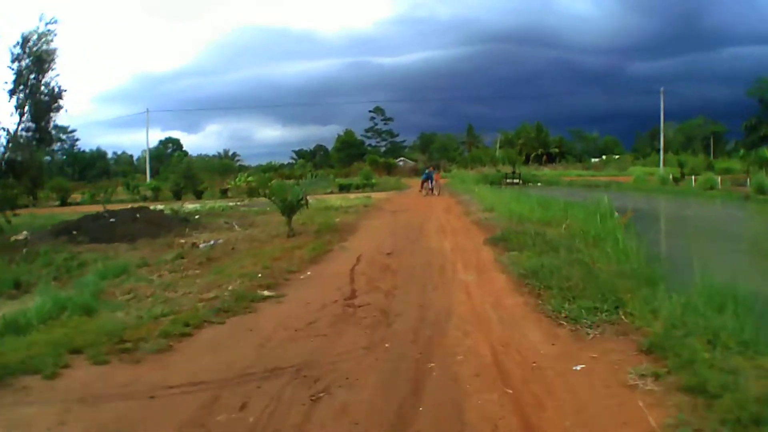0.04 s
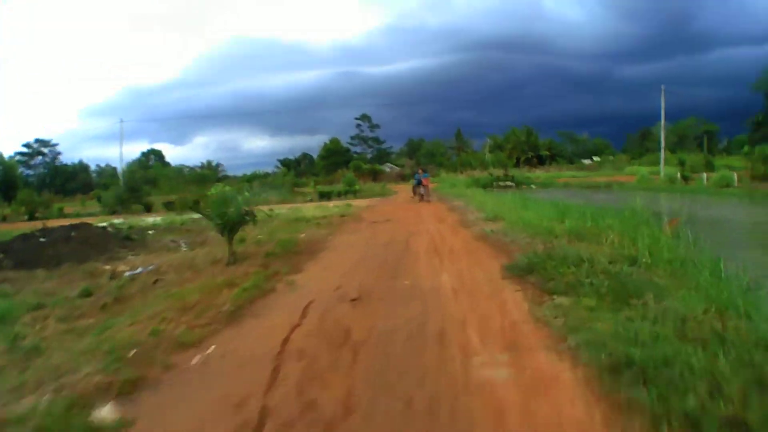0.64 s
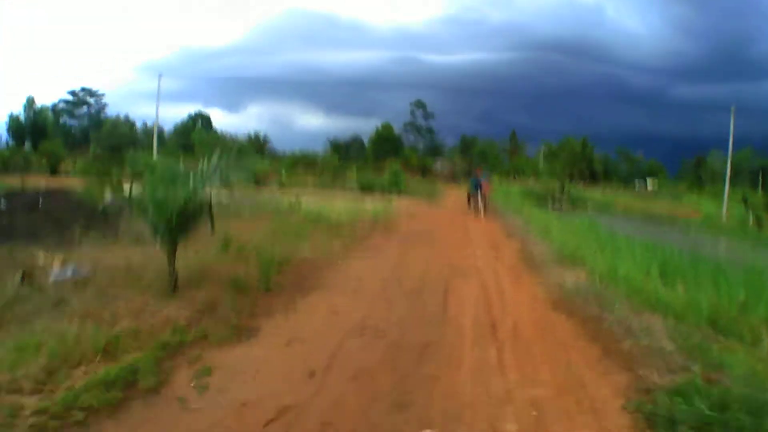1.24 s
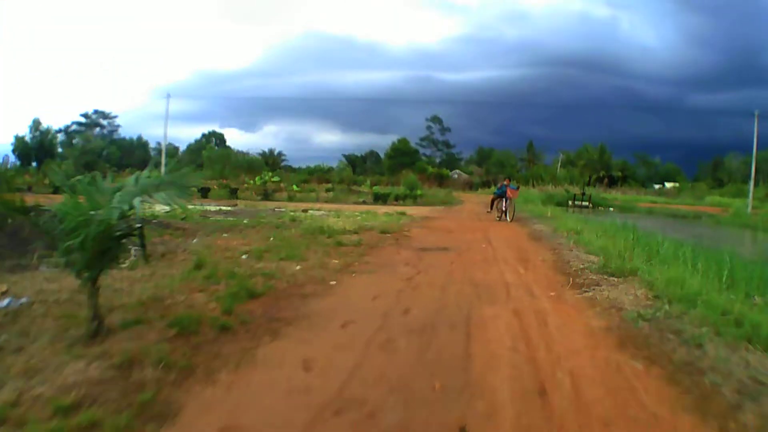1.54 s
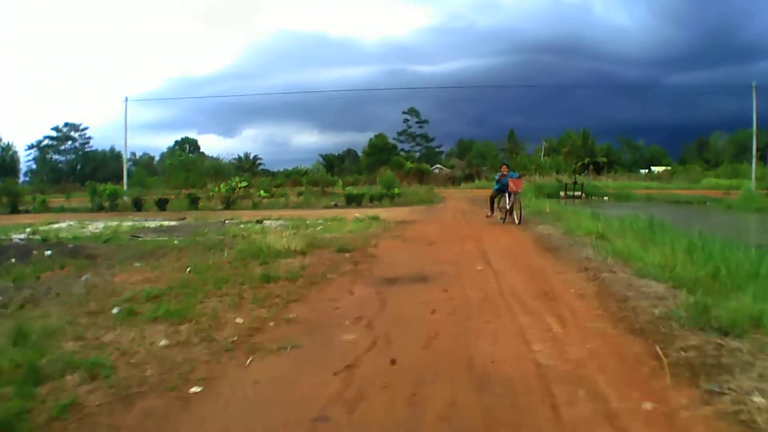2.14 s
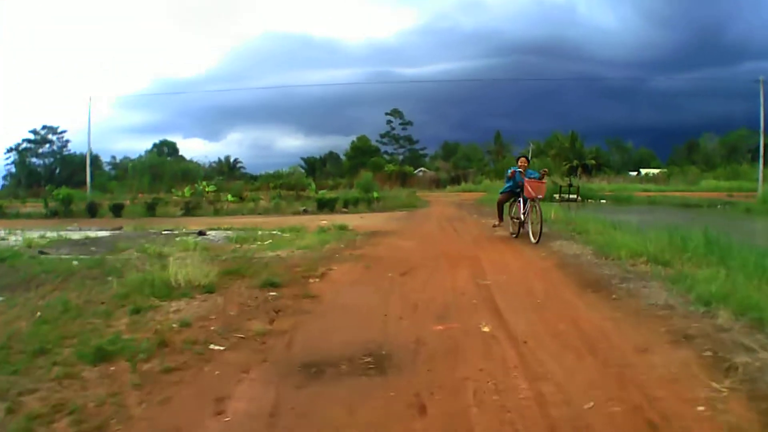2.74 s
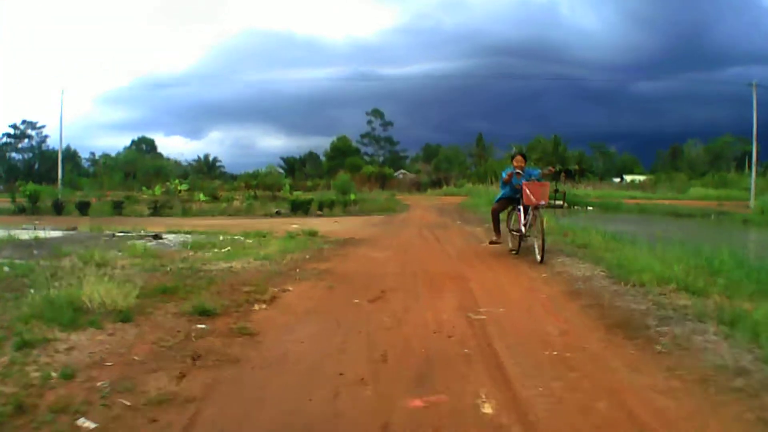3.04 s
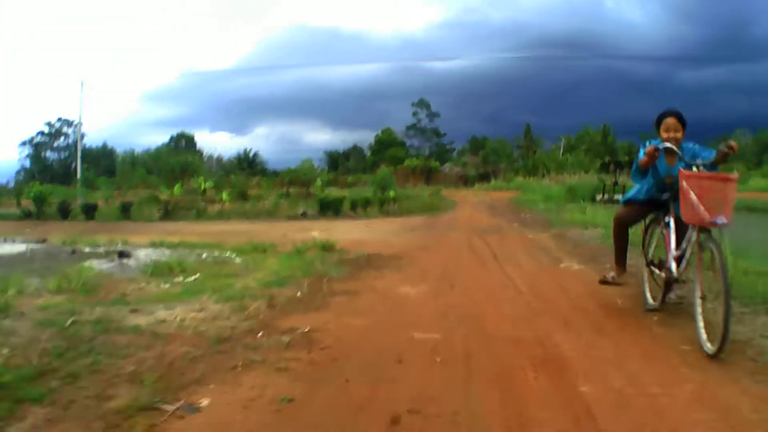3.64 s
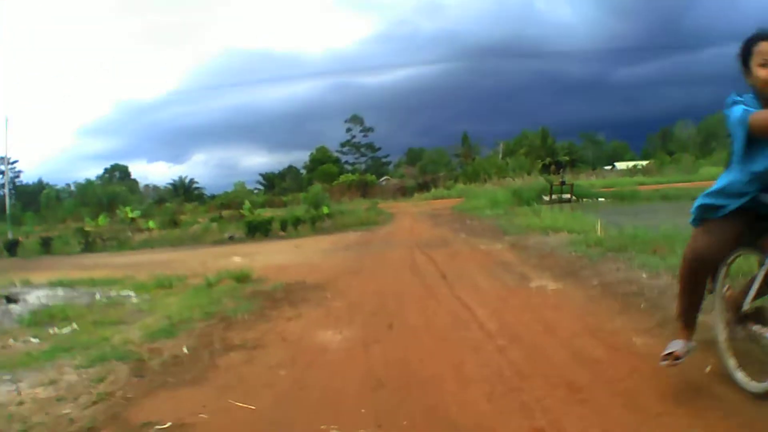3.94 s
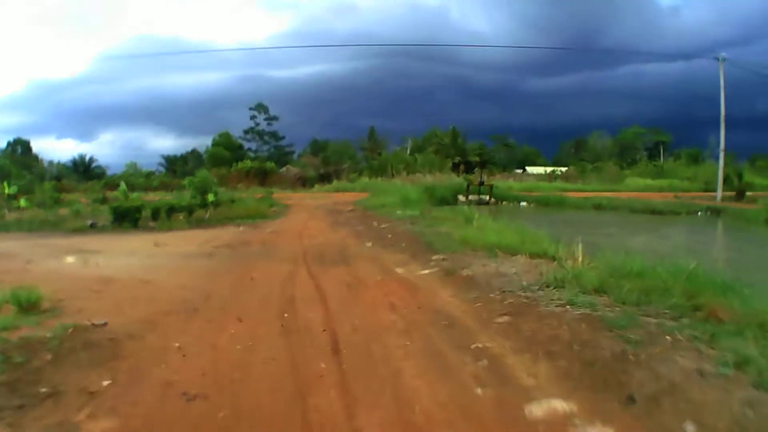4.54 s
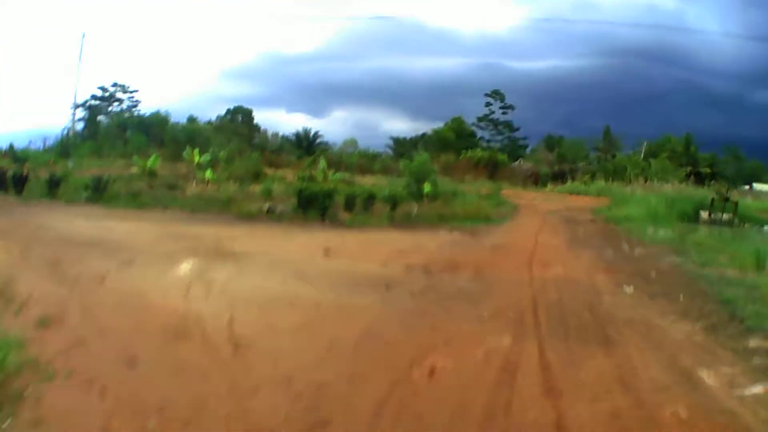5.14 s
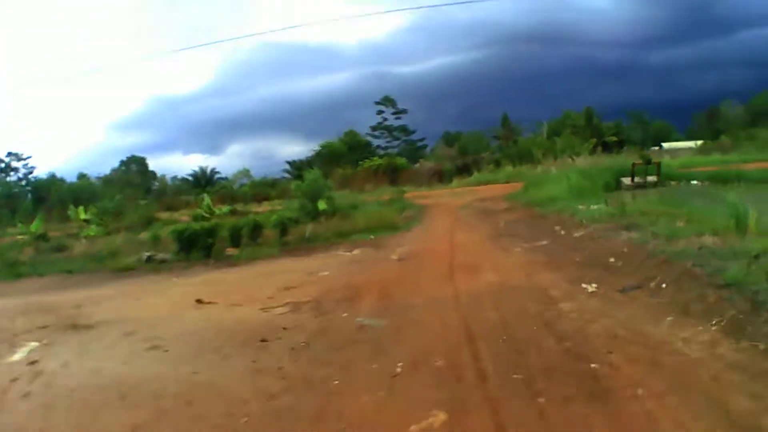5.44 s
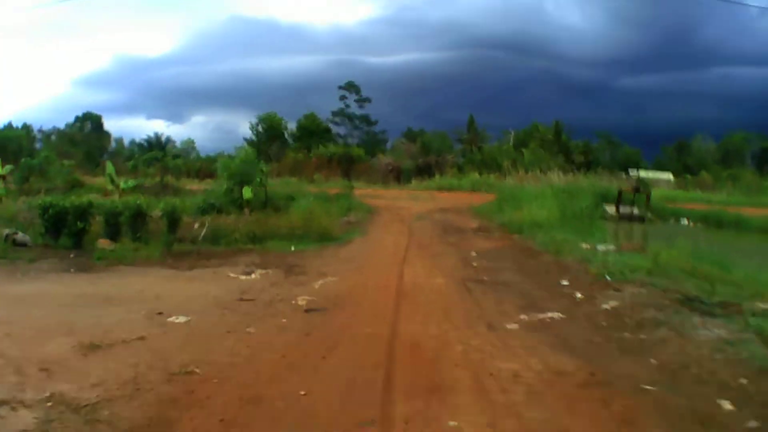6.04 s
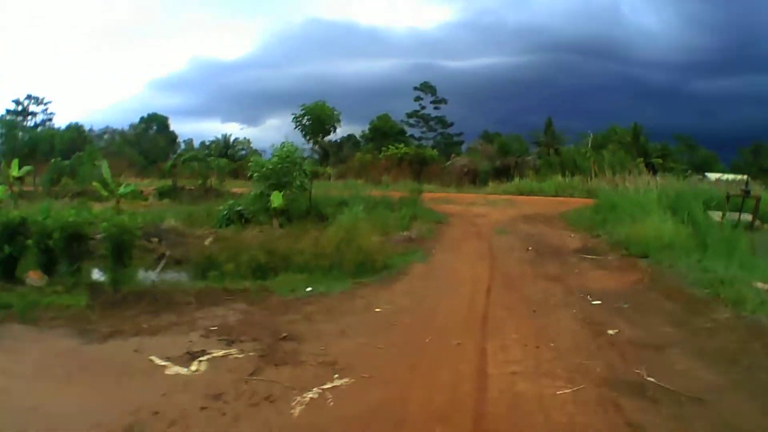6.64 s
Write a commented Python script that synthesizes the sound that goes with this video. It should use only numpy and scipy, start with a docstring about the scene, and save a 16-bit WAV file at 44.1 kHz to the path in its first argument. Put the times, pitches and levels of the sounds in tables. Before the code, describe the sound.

A small motorcycle runs at a steady pace for the whole seven seconds, heard from the saddle on a rough dirt road. The engine is a low, throbbing drone with a boomy body and faint whirr, wavering slightly in pitch and swelling briefly around 3.4, 4.6, 5.4 and 6.5 seconds. Low wind flutter and tyre rumble continue underneath. A loose plastic part ticks quickly and unevenly throughout, with sharper snaps near 1.2, 3.8 and 4.9 seconds. Bumps knock the bodywork with short dull thuds and hollow clacks: several come between 0.2 and 1.2 seconds, a stronger one at 1.8, and a cluster from 2.5 to 3.3. Further thuds follow at about 4.7, 4.9 and 6.5 seconds as the ride carries on.

```python
"""Rough dirt road, heard from the saddle of a small single-cylinder motorcycle.
Wind flutters, tyres rumble through the panels, bumps knock the bodywork.
A loose plastic part ticks about once per crank turn, harder when the road throws it.
The four-stroke engine whirrs in the crankcase, booms in the frame and drones in the silencer."""
import sys
import numpy as np
from scipy import signal
from scipy.io import wavfile
from scipy.ndimage import uniform_filter1d

SR = 44100
rng = np.random.default_rng(int(sys.argv[2]) if len(sys.argv) > 2 else 0)


def materialize(psi):
    """Save the field psi as 16-bit PCM at rate SR to the path in sys.argv[1].

    A 1-D psi becomes a single channel; in a 2-D psi each row is a channel.
    """
    bounded = np.clip(np.atleast_2d(psi).T, -1, 1)
    quanta = np.round(bounded * 32767).astype(np.int16)
    wavfile.write(sys.argv[1], SR, quanta)


N = 298998
TIME_S = np.arange(N) / SR
DRONE_ORDER = 10  # drone cycles per firing
LIGHT_TICK_DB = -43

# Wind and rolling noise: f/Hz, relative density/dB
AIR_SPECTRUM = [(12, -15), (19, 20.5), (30, 1.5), (65, 7), (88, -1), (128, 8.5), (155, 16.5), (210, -11.5),
                (450, -5.5), (900, -15.5), (2000, -22.5)]
# Rumble from road roughness: t/s, level/dB
RUMBLE_LEVEL = [(0, -40), (0.7, -38), (0.85, -43), (1.0, -36.5), (1.3, -39.5), (1.6, -39.5), (1.75, -42.5),
                (2.15, -36.5), (2.45, -41), (2.7, -37.5), (3.2, -41), (3.35, -37.5), (3.7, -37.5),
                (3.98, -43), (4.15, -36), (4.45, -40.5), (4.75, -43), (5.0, -40), (5.3, -36.5),
                (5.52, -44.5), (5.7, -34), (5.85, -39), (6.02, -45.5), (6.15, -37.5), (6.3, -40.5),
                (6.5, -37.5), (6.78, -38.5)]
# Bumps: t/s, thud peak/dB, ring f/Hz, length/s, clack re thud/dB
BUMPS = [(0.244, -22.5, 560, 0.027, -6.5), (0.517, -19, 333, 0.012, -19), (0.788, -19.5, 532, 0.0062, -15),
         (1.034, -22.5, 510, 0.029, -12), (1.222, -22, 458, 0.015, -12), (1.799, -18.5, 500, 0.025, -5.5),
         (2.553, -18, 467, 0.024, -0.5), (2.657, -27.5, 542.3, 0.034, -11), (2.757, -37, 440, 0.0069, 15.5),
         (2.79, -23, 332, 0.01, -4), (3.079, -23, 313.6, 0.015, -4.5), (3.317, -29, 766, 0.02, -17),
         (3.81, -33, 740, 0.012, 5.5), (4.691, -21, 720, 0.0081, -28), (4.886, -21, 384.2, 0.032, -18),
         (6.491, -21.5, 321, 0.034, -11.5)]
# Panel damping, lower for a clean landing: clack re thud/dB, ring width/Hz
PANEL_DAMPING = [(-24, 75), (-10, 150)]

# Machine resonances: f/Hz, width/Hz, gain/dB
PANEL_MODES = [(425, 22, 5), (568.5, 45, 10.5), (620, 100, 2), (749, 110, 1.5), (825, 44, -14)]
FAIRING_MODES = [(870, 210, -11), (1190, 550, -11), (1335, 43, -0.5), (1850, 480, -12.5)]
CRANKCASE_MODES = [(1347, 82, 6.6), (1674, 270, 1), (1865, 140, 2.7)]
FRAME_MODES = [(249, 22, -2.5), (312.1, 82.5, 8.5), (328.5, 75, 0)]
# Resonances of the loose part and its seat: f/Hz, width/Hz, gain/dB
HOLLOW_MODES = [(1405, 140, -2), (1857, 350, 5), (2297, 430, -7.5), (2880, 403, 3.5)]
EDGE_MODES = [(4385, 830, 1), (4620, 380, -6.5), (5230, 230, -18.5)]
UPPER_EDGE_MODES = [(5860, 240, -9.5), (6440, 1300, -5.5)]
SEAT_MODES = [(2360, 640, -1), (2710, 750, -6.5), (3320, 210, -9.5), (3750, 320, -13), (4300, 450, -10),
              (5950, 730, -18)]
# Dips in the tick spectrum: f/Hz, width/Hz, gain/dB
TICK_NOTCHES = [(3340, 990, -5.5), (5660, 620, -4)]

# Part thrown by the road: t/s, snap level/dB, hollow level/dB
HARD_TICKS = [(0.049, -33.5, -33.5), (0.109, -34.5, -36), (0.4, -33.5, -33), (0.4608, -30, -31),
              (0.5191, -31.5, -31.0), (0.6567, -40.5, -38), (0.6935, -33, -33.5), (0.727, -33.0, -35),
              (0.7471, -35.5, -34.5), (0.7962, -37, -35), (0.8496, -36.5, -36.5), (0.8954, -39, -39),
              (0.9397, -31.5, -33.5), (0.9685, -33, -33), (1.0043, -32.5, -35), (1.0333, -34.5, -32),
              (1.063, -32.5, -37.5), (1.1188, -34.0, -35), (1.141, -36, -35.5), (1.1734, -31.5, -32.5),
              (1.212, -27.0, -30.5), (1.231, -29, -33.0), (1.2639, -33.5, -31), (1.292, -29.5, -31),
              (1.345, -28, -30.0), (1.375, -27.5, -30), (1.4072, -33.5, -34), (1.4746, -29.5, -32.0),
              (1.5316, -39, -35), (1.5664, -35.5, -35.5), (1.595, -31.0, -28.5), (1.6642, -32, -36.5),
              (1.7433, -37, -34.5), (1.7756, -37, -33.0), (1.8011, -34.5, -33.5), (1.8558, -33.5, -32),
              (1.9131, -31, -33), (1.9423, -37, -38), (1.9714, -33, -32), (2.0102, -35, -36.5),
              (2.0401, -28.5, -31.5), (2.0994, -34, -36.5), (2.171, -38, -35.5), (2.1988, -32.0, -39),
              (2.2249, -30, -33.0), (2.2769, -33.5, -33.5), (2.3408, -36, -34.5), (2.3963, -34.5, -34),
              (2.5522, -35, -33), (2.5754, -32.5, -32), (2.624, -37, -33.5), (2.6803, -34.5, -34.0),
              (2.713, -32.5, -34), (2.733, -32, -32), (2.7909, -38.5, -34.5), (2.8854, -36.5, -37.5),
              (2.9165, -36, -33), (2.9705, -34.5, -35.5), (3.036, -36.5, -36.5), (3.0967, -37.5, -38.5),
              (3.3017, -35, -33.5), (3.3524, -36.0, -38), (3.4107, -35.0, -36.0), (3.4737, -39, -37.5),
              (3.552, -36.0, -36), (3.613, -34, -32), (3.6733, -34.5, -35.0), (3.7227, -37.5, -38),
              (3.7942, -22, -25), (3.8244, -33.5, -31.5), (3.8562, -30.5, -31), (3.917, -32.5, -33),
              (3.9791, -32.5, -32.5), (4.008, -33.5, -32.5), (4.0347, -29.5, -32), (4.0945, -32.5, -35.5),
              (4.211, -35.5, -35), (4.2653, -34, -32.5), (4.3313, -28, -33.5), (4.3875, -34, -33),
              (4.442, -30.5, -36), (4.4974, -34.5, -33.5), (4.5639, -31, -32.5), (4.624, -37, -35.0),
              (4.6719, -32.5, -34), (4.733, -30.5, -30.5), (4.8653, -23.5, -29.5), (4.8897, -30.5, -31),
              (4.9215, -31.5, -31.0), (4.9527, -36, -34.5), (4.9888, -29.5, -32), (5.0767, -37.5, -38),
              (5.1118, -38.0, -33.0), (5.1972, -31, -35), (5.2265, -34, -32.5), (5.2535, -38, -38),
              (5.3938, -35, -34.5), (5.4541, -33.5, -34), (5.4863, -39.5, -38.5), (5.52, -33.0, -32.0),
              (5.5668, -37, -35.5), (5.67, -36, -31.5), (5.7264, -35.5, -34.5), (5.7803, -33, -34),
              (5.8296, -35.5, -33.5), (5.885, -36.5, -34.0), (5.956, -34.0, -34.5), (5.984, -38, -41),
              (6.003, -33, -32), (6.0632, -33, -32.5), (6.0896, -42, -34.5), (6.1207, -31, -30.5),
              (6.1788, -29, -29), (6.2421, -29, -36.5), (6.2908, -35.5, -33.5), (6.3557, -32.5, -33.0),
              (6.4578, -36.5, -39), (6.655, -33, -32), (6.7193, -46, -36)]
# Part resting on its seat: t/s, length/s
RESTS = [(0.139, 0.11), (2.432, 0.071), (2.986, 0.028), (3.184, 0.058), (4.746, 0.092), (5.02, 0.076),
         (5.264, 0.066), (6.47, 0.11)]
# Part sliding on its seat: t/s, length/s, level/dB, f/Hz, width/Hz
SLIDES = [(0.07, 0.018, -53, 3270, 60), (0.264, 0.011, -41.5, 4240, 900), (0.603, 0.017, -46, 4520, 900),
          (3.33, 0.04, -63, 5900, 700), (4.246, 0.027, -51, 3814, 900), (5.756, 0.023, -55, 4311, 700)]

# Frame boom: t/s, level/dB
FRAME_LEVEL = [(0.0, -33.5), (0.32, -34), (0.38, -26.5), (0.45, -35), (0.49, -28.5), (0.98, -30),
               (1.05, -25.5), (1.09, -34.5), (1.38, -32), (4.36, -30), (4.49, -36.5), (4.55, -30),
               (4.66, -33), (4.68, -27), (4.79, -34), (4.97, -27.5), (5.0, -36.5), (5.27, -28.5),
               (6.06, -31.5), (6.21, -29.5), (6.29, -41), (6.34, -29.5), (6.78, -31)]
# Exhaust drone, tied to engine speed: t/s, f/Hz
EXHAUST_PITCH = [(0.0, 182.3), (0.34, 181.9), (0.51, 157.5), (0.68, 176.4), (0.87, 178), (1.05, 161),
                 (1.62, 177.4), (2.06, 163.6), (2.11, 177.1), (2.98, 168.1), (3.02, 180.1), (3.49, 179),
                 (3.78, 163), (3.85, 173.3), (4.63, 178.9), (5.17, 159.4), (5.27, 175.3), (5.91, 175.4),
                 (6.27, 161.6), (6.55, 184.3), (6.69, 165), (6.78, 181)]
# Exhaust drone: t/s, level/dB
EXHAUST_LEVEL = [(0.0, -30), (0.23, -44), (0.32, -25.5), (0.38, -36), (0.79, -31.5), (0.83, -42),
                 (0.89, -34), (1.23, -35), (1.26, -28.5), (1.32, -39), (1.34, -29), (2.23, -30.5),
                 (2.28, -39), (2.32, -30.5), (2.45, -57), (2.51, -28), (2.64, -37), (2.68, -28),
                 (2.76, -51), (2.79, -26.5), (2.85, -44), (2.91, -30), (3.13, -28.5), (3.19, -37),
                 (3.38, -20.5), (3.44, -35), (3.53, -27.5), (3.91, -35.5), (4.27, -24.5), (4.32, -37),
                 (4.38, -25.5), (4.46, -48), (4.59, -20.5), (4.63, -40), (4.74, -45), (4.78, -29),
                 (4.83, -53), (4.89, -33), (5.3, -31), (5.38, -40), (5.42, -20), (5.48, -54), (5.53, -30),
                 (5.83, -27.5), (5.89, -37), (6.04, -37), (6.1, -28), (6.46, -36.5), (6.5, -21.5),
                 (6.53, -19.5), (6.57, -34), (6.61, -25), (6.78, -36)]


def from_db(db):
    """Decibels to gain."""
    return 10 ** (np.asarray(db) / 20)


def unit_rms(x):
    """Scale to rms 1."""
    return x / np.sqrt(np.mean(x ** 2) + 1e-20)


def curve(rows):
    """Breakpoints interpolated per sample."""
    return np.interp(TIME_S, *np.transpose(rows))


def hump(at_s, length_s):
    """Gaussian swell, peak 1."""
    return np.exp(-(2 * (TIME_S - at_s) / length_s) ** 2)


def drift(rate_hz):
    """Slow random wander, rms 1."""
    hop, settle = 40, 2000
    pole = np.exp(-2 * np.pi * rate_hz * hop / SR)
    white = rng.standard_normal(N // hop + settle + 2)
    slow = signal.lfilter([1], [1, -2 * pole, pole * pole], white)[settle:]
    return np.interp(np.arange(N) / hop, np.arange(len(slow)), unit_rms(slow))


def resonate(x, hz, width_hz):
    """Two-pole resonance, peak gain 1."""
    radius = np.exp(-np.pi * width_hz / SR)
    feedback = [1, -2 * radius * np.cos(2 * np.pi * hz / SR), radius ** 2]
    return signal.lfilter(np.array([1, 0, -1]) * (1 - radius ** 2) / 2, feedback, x + 1e-18)


def resonate_twice(x, hz, width_hz):
    """Resonance with steeper skirts."""
    return resonate(resonate(x, hz, width_hz), hz, width_hz)


def ring_modes(x, modes, scatter_db=0):
    """Parallel resonances, optional random gain per mode."""
    return sum(from_db(db + scatter_db * rng.standard_normal()) * resonate(x, hz, width_hz)
               for hz, width_hz, db in modes)


def band(x, low_hz, high_hz):
    """Butterworth band-pass."""
    return signal.sosfilt(signal.butter(2, [low_hz, high_hz], "band", fs=SR, output="sos"), x)


def steady(x, window_s):
    """Hold the running rms at 1."""
    size = max(int(window_s * SR / 2), 1)
    return x / np.sqrt(uniform_filter1d(uniform_filter1d(x ** 2, size), size) + 1e-20)


def add(out, at_s, sound):
    """Mix a sound in at a time."""
    start = int(np.clip(at_s * SR, 0, N - 1))
    out[start:start + len(sound)] += sound[:N - start]


def puffs(cycles, decay):
    """Turbulent noise, one decaying burst per cycle."""
    return unit_rms(rng.standard_normal(N) * np.exp(-decay * (cycles % 1)))


def air(level_db, flutter_db):
    """Wind and rolling noise: half-octave bands fluttering separately."""
    out, edges_hz = 0, 12 * 2 ** np.arange(0, 8, .5)
    white = rng.standard_normal((2, N))
    hz, db = np.transpose(AIR_SPECTRUM)
    for k, (low_hz, high_hz) in enumerate(zip(edges_hz, edges_hz[1:])):
        band_db = np.interp(np.log(low_hz * high_hz) / 2, np.log(hz), db)
        out += band(white[k % 2], low_hz, high_hz) * from_db(band_db + flutter_db * drift(18))
    return from_db(level_db) * unit_rms(out)


def tyres():
    """Lumps of dirt shake the panels through the wheels."""
    lumps = rng.standard_normal(N) * from_db(3.3 * drift(27))
    rumble = band(ring_modes(lumps, PANEL_MODES), 380, 998)
    return from_db(curve(RUMBLE_LEVEL) + 0.5) * steady(rumble, window_s=0.19)


def knocks(size=4000):
    """Each bump sets off a flurry of contacts: dull panel thud, hollow fairing clack."""
    out, t = np.zeros(N), np.arange(size) / SR
    for at_s, db, hz, length_s, clack_db in BUMPS:
        flurry = rng.standard_normal((2, size)) * np.exp(-(t / length_s) ** 4)
        width_hz = np.interp(clack_db, *np.transpose(PANEL_DAMPING))
        thud = band(resonate(flurry[0], hz, width_hz), 220, 1000)
        clack = band(ring_modes(flurry[1], FAIRING_MODES), 700, 1900)
        knock = thud / np.abs(thud).max() + from_db(clack_db) * clack / np.abs(clack).max()
        add(out, at_s, from_db(db) * knock)
    return out


def shaking_db(follow=.4, rest_db=-14):
    """Relative force on the loose part: tracks the hard ticks, drops at rest."""
    at_s, snap_db, _ = np.transpose(HARD_TICKS)
    swing_db = np.interp(TIME_S, at_s, snap_db - snap_db.mean())
    resting = sum((TIME_S > start_s) & (TIME_S < start_s + length_s) for start_s, length_s in RESTS)
    return follow * swing_db + rest_db * resting


def graze(force_db, level_db):
    """The part rubs its seat into a faint ring that follows the force."""
    rubbing = rng.standard_normal(N) * from_db(3.5 * drift(70))
    hiss = sum(from_db(db + 1.9 * drift(13)) * unit_rms(resonate_twice(rubbing, hz, width_hz))
               for hz, width_hz, db in SEAT_MODES)
    return hiss * from_db(level_db + force_db)


def scrapes():
    """The part slides on its seat: short rasps and rings."""
    rubbing = rng.standard_normal(N) * from_db(3 * drift(200))
    return sum(from_db(db) * hump(at_s, length_s) * unit_rms(resonate_twice(rubbing, hz, width_hz))
               for at_s, length_s, db, hz, width_hz in SLIDES)


def tick(snap_db, hollow_db, grit_s, grit, bounce_db, size=700):
    """Dry plastic snap: the edge catches three times and rebounds, the hollow body buzzes on."""
    t = np.arange(size) / SR
    catches = np.zeros(size)
    catch_s = np.array([rng.uniform(0, .0006), .0009, rng.uniform(.0012, .0016)])
    catches[(catch_s * SR).astype(int)] = rng.choice([-1, 1], 3) * [.3, 1, .3]
    lag = int(rng.uniform(.001, .005) * SR)
    rebound = from_db(bounce_db + 4 * rng.standard_normal()) * np.pad(catches, (lag, 0))[:size]
    friction = rng.standard_normal((2, size)) * (t > .0007)
    grit_env = grit * (np.exp(-t / grit_s) + from_db(-24) * np.exp(-t / .005))
    buzz_env = .28 * np.exp(-t / .0033)
    contact = catches + rebound + friction * [grit_env, buzz_env]
    for hz, width_hz, db in TICK_NOTCHES:
        contact -= (1 - from_db(db)) * resonate(contact, hz, width_hz)
    detune = [1 + .008 * rng.standard_normal(), 1, 1]  # each tick lands on a different spot
    edge = ring_modes(contact[0], np.multiply(EDGE_MODES + UPPER_EDGE_MODES, detune), scatter_db=1)
    hollow = ring_modes(contact[1], np.multiply(HOLLOW_MODES, detune), scatter_db=1)
    parts = band(edge, 3900, 5450), band(hollow, 1100, 3200)
    edge, hollow = [x / np.sqrt(np.sum(x ** 2) / (.006 * SR)) for x in parts]  # energy of 6 ms at rms 1
    return from_db(snap_db + 0.5) * edge + from_db(hollow_db + 1.5) * hollow


def light_ticks(turns, force_db, off_turn_db=-4, spread_db=4, jitter_s=.0035):
    """One tick per crank turn between hard ticks, every second one weaker: t/s, snap/dB, hollow/dB."""
    marks_s = [0, *np.array(HARD_TICKS)[:, 0], TIME_S[-1]]
    gap_turns = np.round(np.diff(np.interp(marks_s, TIME_S, turns))).astype(int)
    at_s, off_turn = np.transpose([(start_s + (end_s - start_s) * k / count, k % 2)
                                   for start_s, end_s, count in zip(marks_s, marks_s[1:], gap_turns)
                                   for k in range(1, count)])
    jitter, spread = rng.standard_normal((len(at_s), 2)).T
    snap_db = LIGHT_TICK_DB + np.interp(at_s, TIME_S, force_db)
    snap_db += off_turn_db * off_turn + spread_db * np.minimum(spread, 1)
    hollow_db = -13.5 + 0.62 * snap_db
    return np.transpose([at_s + jitter_s * jitter, snap_db, hollow_db])


def rattle(turns, force_db, fall_back_chance=.45, chatter_per_s=13):
    """The part ticks hard and light, often falls back, brushes its seat before hard ticks, chatters."""
    out, light = np.zeros(N), light_ticks(turns, force_db)
    for at_s, snap_db, hollow_db in HARD_TICKS:
        add(out, at_s, tick(snap_db, hollow_db, grit_s=.002, grit=.085, bounce_db=-18))
    for at_s, snap_db, hollow_db in light:
        add(out, at_s, tick(snap_db, hollow_db, grit_s=.0025, grit=.11, bounce_db=-11.5))
    fall_backs = [(at_s + rng.uniform(.006, .024), db - 17)
                  for at_s, db, _ in [*HARD_TICKS, *light] if rng.random() < fall_back_chance]
    brushes = [(at_s - rng.uniform(.001, .003), db - 21) for at_s, db, _ in HARD_TICKS]
    chatter = [(TIME_S[i], LIGHT_TICK_DB + force_db[i] - 12)
               for i in rng.integers(0, N, int(chatter_per_s * N / SR))]
    for at_s, db in fall_backs + brushes + chatter:
        db += 4 * rng.standard_normal()
        add(out, at_s, tick(db, db + 2, grit_s=.0005, grit=.14, bounce_db=-12))
    return out


def crankcase(turns):
    """Valve gear and piston whirr in the crankcase."""
    whirr = ring_modes(puffs(turns, decay=0.94), CRANKCASE_MODES)
    whirr = band(band(whirr, 1100, 2000), 1100, 2000)
    return from_db(-47.5 + 5.32 * drift(69)) * unit_rms(whirr)


def frame(turns):
    """Each crank turn shakes the frame; close modes boom, louder on bumps."""
    shake = puffs(turns, decay=1.0)
    boom = sum(from_db(db) * resonate_twice(shake, hz, width_hz) * (-1) ** k
               for k, (hz, width_hz, db) in enumerate(FRAME_MODES))
    bump_gain = sum(from_db(db - 21) * hump(at_s, length_s=0.058) for at_s, db, *_ in BUMPS)
    level_db = curve(FRAME_LEVEL) - 0.22 + 3 * np.tanh(drift(8.6))
    return (from_db(level_db) + bump_gain) * steady(boom, window_s=0.16)


def exhaust(firings):
    """The silencer picks one order of the firing rate; uneven puffs roughen it, the fundamental throbs."""
    tone = np.sqrt(2) * np.sin(2 * np.pi * DRONE_ORDER * firings) * from_db(1.5 * drift(18))
    gas = puffs(firings, decay=2.9)
    rough = unit_rms(resonate(resonate(gas, 161.2, 24), 176.5, 22))
    level_db = curve(EXHAUST_LEVEL) - 0.23 + 2 * np.tanh(drift(6.8))
    drone = from_db(level_db) * steady(tone + from_db(-5.5) * rough, window_s=0.13)
    throb = from_db(-40.5) * np.sin(2 * np.pi * firings)
    return drone + throb


def scene():
    """Engine speed paces engine and rattle; the ride adds rumble, knocks and wind. Mono."""
    firings = np.cumsum(curve(EXHAUST_PITCH) / DRONE_ORDER) / SR
    turns = 2 * firings  # four-stroke
    engine = exhaust(firings) + frame(turns) + crankcase(turns)
    force_db = shaking_db()
    loose_part = rattle(turns, force_db) + graze(force_db, level_db=-63.5) + scrapes()
    return (engine + loose_part + tyres() + knocks() + air(level_db=-34, flutter_db=3.5))[None]


def record(dry, rolloff_hz=6600, stop_hz=7600):
    """Treble roll-off, then a steep cut."""
    soft = signal.sosfilt(signal.butter(12, rolloff_hz, fs=SR, output="sos"), dry)
    return signal.sosfilt(signal.cheby2(14, 45, stop_hz, fs=SR, output="sos"), soft)


dry = scene()
out = record(dry)
materialize(out)
```